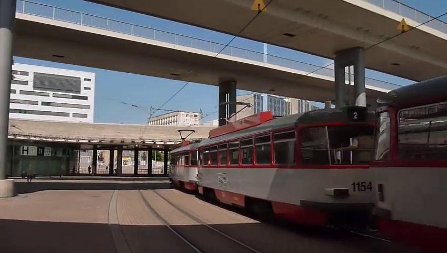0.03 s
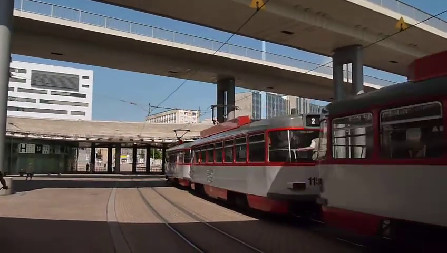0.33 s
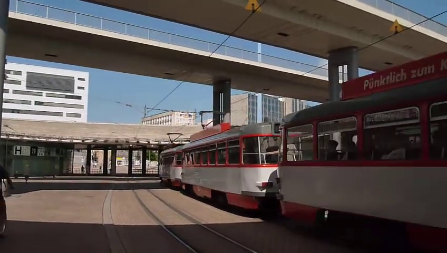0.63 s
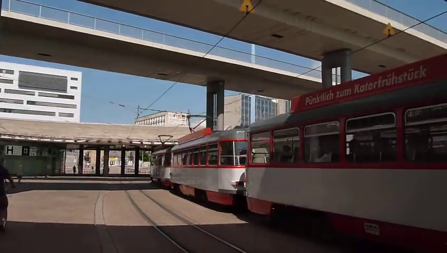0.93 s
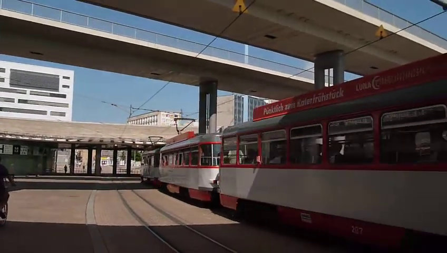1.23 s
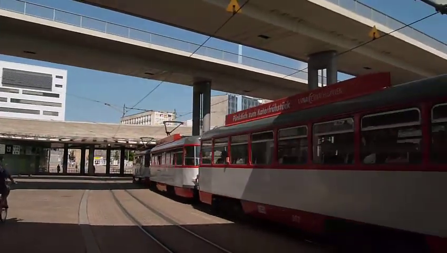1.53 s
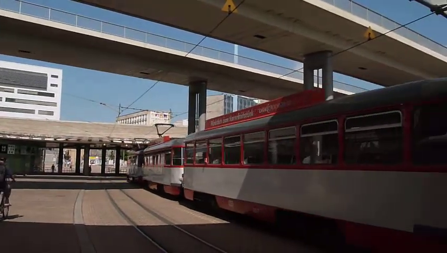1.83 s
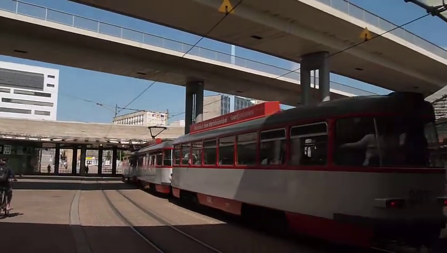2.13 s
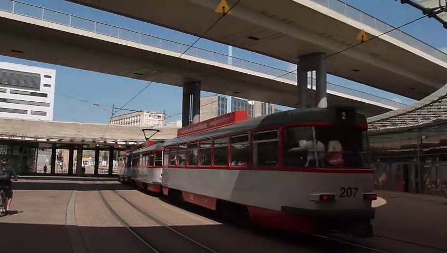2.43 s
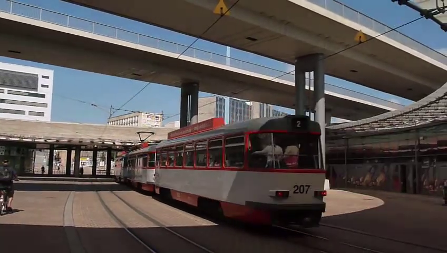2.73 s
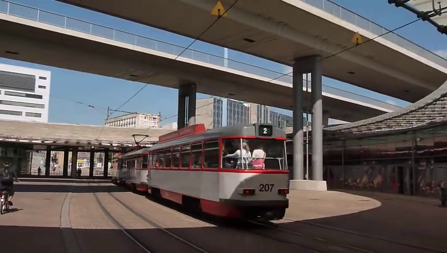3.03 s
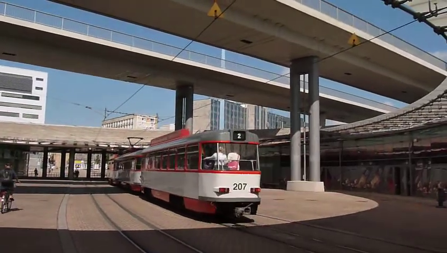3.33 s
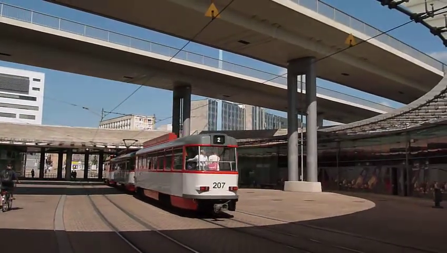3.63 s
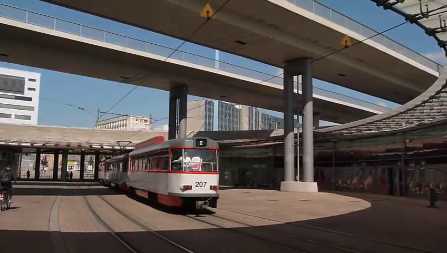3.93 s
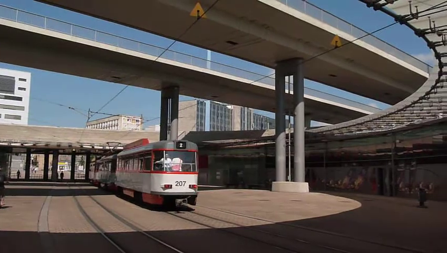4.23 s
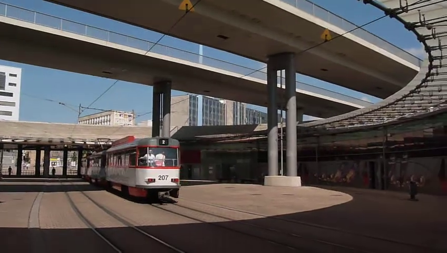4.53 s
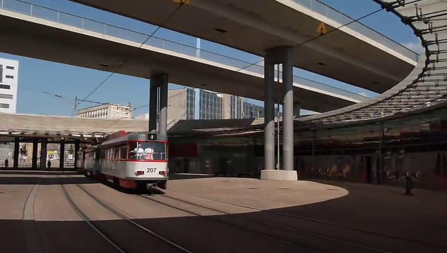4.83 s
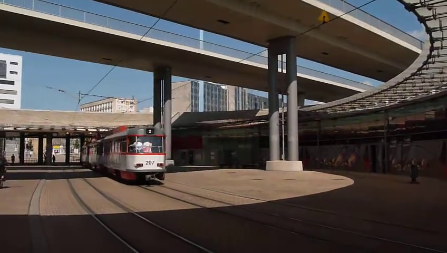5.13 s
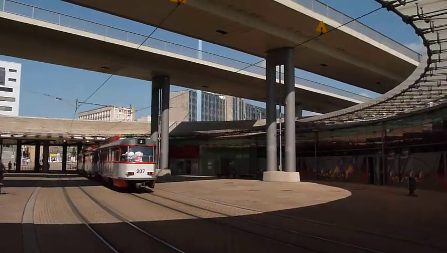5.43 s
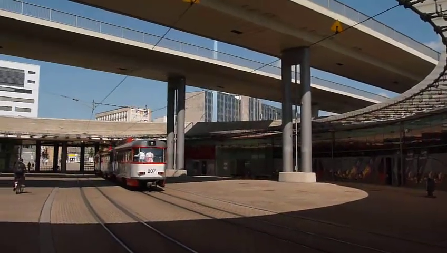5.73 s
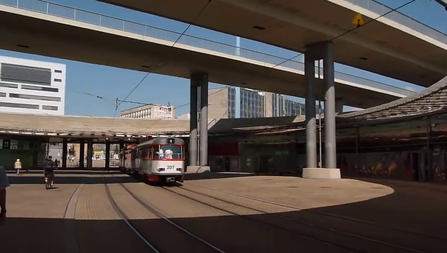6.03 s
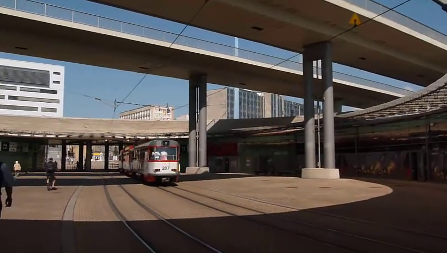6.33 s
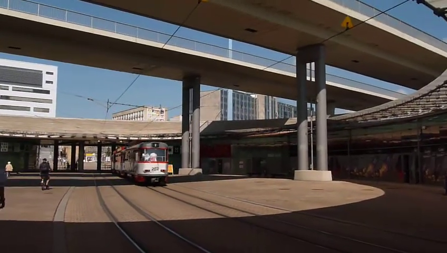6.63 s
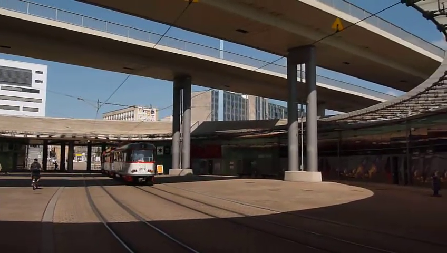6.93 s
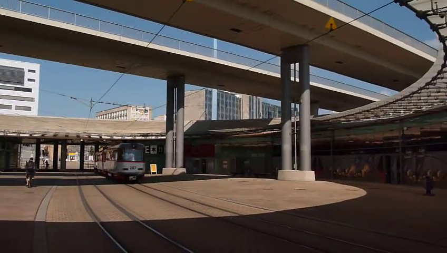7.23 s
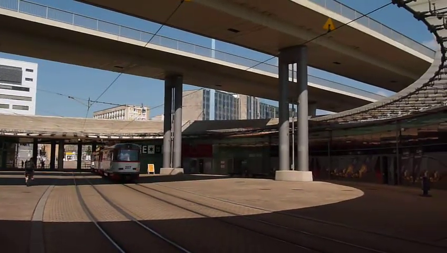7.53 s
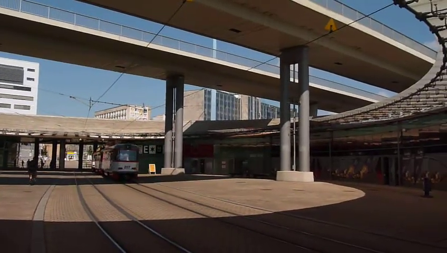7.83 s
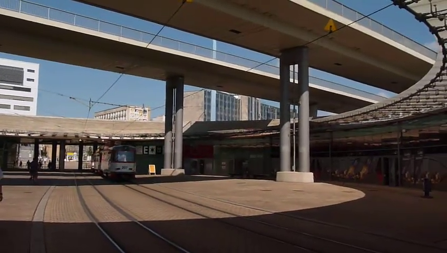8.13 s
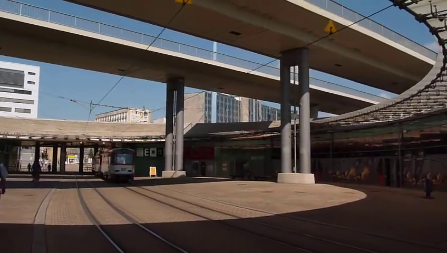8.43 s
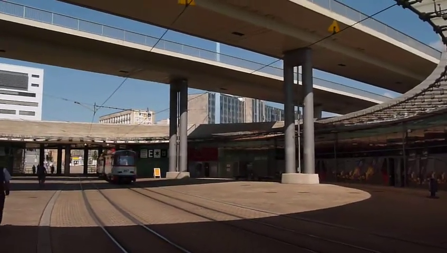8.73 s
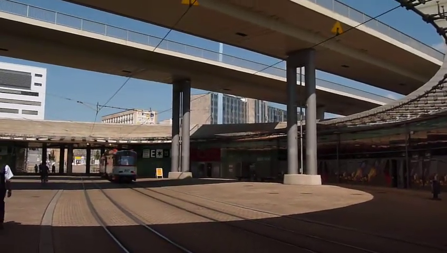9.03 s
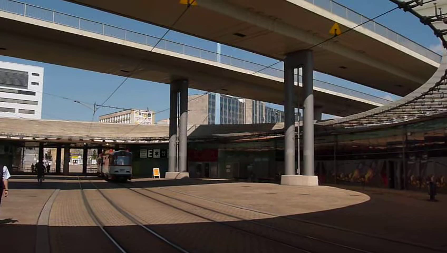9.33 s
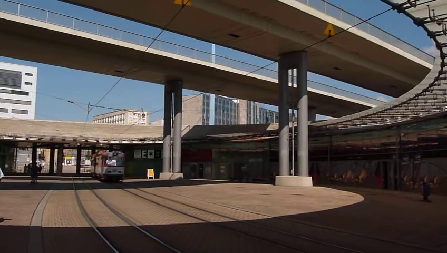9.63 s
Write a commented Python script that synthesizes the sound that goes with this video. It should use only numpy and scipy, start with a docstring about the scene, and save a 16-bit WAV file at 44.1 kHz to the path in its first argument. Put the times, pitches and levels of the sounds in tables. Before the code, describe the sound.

Tram wheels roar and howl round a curve in an echoing plaza, with a sinking gear whine, faint squeals and a few clanks.

```python
"""First you hear a tram rumbling round a curve close by, its wheels howling on one low note.
The wheel rims chirp and scrape, and a gear whine sinks as the cars roll away under road bridges
across a paved plaza. Twice the tram clanks over rail joints. At the end the howl of a slipping
wheel grows so loud that a limiter turns everything down."""
import sys
import numpy as np
from scipy import signal
from scipy.fft import rfft, irfft
from scipy.io import wavfile
from scipy.ndimage import uniform_filter1d

SR = 44100
rng = np.random.default_rng(int(sys.argv[2]) if len(sys.argv) > 2 else 0)


def persist_wave(psi):
    """Save psi, clipped to +-1, as 16-bit WAV."""
    counts = np.round(np.clip(psi, -1, 1) * 32767).astype(np.int16)
    wavfile.write(sys.argv[1], SR, np.atleast_2d(counts).T)


N = 431298
TIME, FREQS = np.arange(N) / SR, np.fft.rfftfreq(N, 1 / SR)


def gain_of(db):
    """Turns decibels into a number to multiply a sound by."""
    return 10 ** (np.asarray(db) / 20)


def evened(x):
    """Scales a signal so that its average power is 1."""
    return x / np.sqrt(np.mean(abs(x) ** 2) + 1e-20)


def curves(rows):
    """Joins the rows of a time table with straight lines, one curve for each column of values."""
    seconds, *columns = np.transpose(rows)
    return [np.interp(TIME, seconds, column) for column in columns]


def value_at(points, hz):
    """Looks up a frequency in a table, on a scale where octaves are evenly spaced."""
    table_hz, value = np.transpose(points)
    return np.interp(np.log(hz + 1), np.log(table_hz + 1), value)


def colour(points, resonances):
    """The gain at each frequency: a broad shape with narrow peaks and dips on it."""
    peaks_db = sum(db / (1 + (2 * (FREQS - hz) / width) ** 2) for hz, width, db in resonances)
    return gain_of(value_at(points, FREQS) + peaks_db)


def drift(rate_hz):
    """A random wobble in size and phase, up to about the given rate."""
    count = 4096
    hz = np.fft.fftfreq(count, TIME[-1] / count)
    noise = rng.standard_normal(count) + 1j * rng.standard_normal(count)
    wobble = np.fft.ifft(noise / (1 + (hz / rate_hz) ** 2))
    return evened(np.interp(TIME, np.linspace(0, TIME[-1], count), wobble))


def pure_tone(hz):
    """A tone that follows a pitch curve, as complex numbers; the real part is the sound."""
    return np.exp(2j * np.pi * np.cumsum(hz) / SR)


# How long the plaza echoes. Each row: frequency in Hz, seconds to fade by 60 dB.
ECHO_TIMES = [(200, 1.5), (1500, 1.7), (6000, 1.4)]

def plaza_echo(sound):
    """Paving, bridges and house fronts throw back a wash of echoes; the treble dies first."""
    hz, age, noise = signal.stft(rng.standard_normal(SR), SR, nperseg=256)
    decay = gain_of(-60 * age / value_at(ECHO_TIMES, hz)[:, None])
    build_up = 1 - np.exp(-age / 0.017)
    tail = signal.istft(noise * decay * build_up, SR, nperseg=256)[1]
    return signal.fftconvolve(sound, tail / np.linalg.norm(tail))[:N]


# The rolling swells as the cars run in under the bridges. Each row: time in seconds, level in dB.
SWELL = [(0, -4), (1.2, -3), (2.1, -3), (4, -2), (5.7, 0.5), (6.4, -.5), (7.7, 1.5), (8.5, -2.2),
         (9.78, 0.3)]
# Four layers, low to high: ground rumble, car body drone, wheel roar, hiss.
# Each row: base level in dB, how strongly it follows the swell, dB lost per second once far off.
LAYERS = [(-34.5, .9, 0.35), (-26.5, 1.2, 0), (-29, 1, 0.28), (-41.5, 1.05, 1.07)]
# Uneven track makes the low noise heave.
# Each row: middle in seconds, half length in seconds, change of rumble in dB, change of drone in dB.
TRACK_HEAVES = [(0.701, 0.69, 0, 1.9), (1.72, .16, 3.5, -1.5), (4.2, 0.29, 2, 0), (6.103, .3, 2.5, .5),
                (7.85, 0.19, 1.5, 3), (9.2, 0.97, 0.5, 1.5)]

def rolling_levels(far_off_s=5.15):
    """Each layer's level in dB: all swell, the two lowest heave, and distance takes the hiss away."""
    swell = curves(SWELL)[0]
    gone_s = np.maximum(TIME - far_off_s, 0)
    rumble, drone, roar, hiss = [db + follow * swell - loss * gone_s for db, follow, loss in LAYERS]
    for middle, half_length, rumble_db, drone_db in TRACK_HEAVES:
        heave = np.exp(-((TIME - middle) / half_length) ** 2)
        rumble, drone = rumble + rumble_db * heave, drone + drone_db * heave
    return rumble, drone, roar, hiss


# The broad shape of the rolling noise. Each row: frequency in Hz, relative level in dB.
ROLLING_SHAPE = [(22, -38), (36, -25.5), (52, -14.5), (115, -16), (190, -6), (320, -0.5), (490, -9),
                 (620, -5.5), (1000, -17), (1350, -19), (2340, -30.5), (4000, -37.5), (5500, -43.5),
                 (7400, -63)]
# Peaks and dips that wheels, rails and car body add to it.
# Each row: frequency in Hz, width in Hz, boost in dB close by, boost in dB far off.
ROLLING_RESONANCES = [(62.4, 23, 5.5, 1), (80, 9.8, -6.5, -2), (134, 20, 2, -4.5), (197, 77, 2.5, 5.5),
                      (332, 110, -4.5, -0.5), (770, 120, 4, 1), (1003, 120, -1.5, 3.5),
                      (1100, 190, 8.5, 4.5), (1216, 43, 4.5, 3), (1484, 55, 10, 4), (1708, 220, 9.5, 5),
                      (1941, 66, 5, 8), (2700, 110, -1, 0.5)]
# How far the last car has gone. Each row: time in seconds, distance from 0 (close) to 1 (far).
TRAM_DISTANCE = [(0, 0), (1.5, 0.18), (2.6, 0.63), (5, 1)]

def rolling(wander_db=1.27, grit_db=0.3):
    """Rough wheels on rough rails shake the ground, the car bodies and the steel itself."""
    roughness = rfft(rng.standard_normal(N))
    far = curves(TRAM_DISTANCE)[0]
    hz, width, near_db, far_db = np.transpose(ROLLING_RESONANCES)
    # A layer is fully on between its two corners; its core band sets how loud it is.
    corners_hz = [20, 130, 170, 420, 620, 1500, 2300, 8000]
    cores_hz = [(30, 150), (150, 480), (600, 1500), (2200, 5000)]
    out, levels = np.zeros(N), rolling_levels()
    for weight, boost_db in ((1 - far, near_db), (far, far_db)):
        spectrum = roughness * colour(ROLLING_SHAPE, zip(hz, width, boost_db))
        for layer, (low, high) in enumerate(cores_hz):
            band = np.interp(FREQS, corners_hz, np.repeat(np.arange(len(cores_hz)) == layer, 2))
            core_size = np.sqrt(2) * np.linalg.norm(spectrum[(FREQS > low) & (FREQS < high)]) / N
            out += weight * gain_of(levels[layer]) * irfft(spectrum * band, N) / core_size
    return out * gain_of(wander_db * drift(1.2).real + grit_db * drift(35).real)


# The gears whine and the motors hum. Each row: time in seconds, pitch in Hz, level in dB.
GEAR_WHINE = [(0, 805, -32.5), (.6, 812, -34), (1.22, 782, -32.5), (1.5, 786, -47.5), (2.1, 731, -37),
              (3, 716, -40.5), (4.3, 682, -41), (5.5, 647, -57)]
MOTOR_HUM = [(0, 214.5, -28), (.42, 210, -26.5), (.55, 208.4, -36), (1.25, 204.6, -37.5), (1.7, 202.6, -38),
             (3, 196.5, -46)]

def drive_tone(rows, spread_hz):
    """Several axles turn at nearly the same speed, so their tones blur together."""
    hz, db = curves(rows)
    fade = np.clip(rows[-1][0] + 1 - TIME, 0, 1)  # over one second after the last row
    return np.sqrt(2) * gain_of(db) * fade * (pure_tone(hz) * drift(spread_hz)).real


# Wheels scrape and clank over the track. Each row: start in seconds, level in dB,
# rise in seconds, seconds to fade by 60 dB, added brightness in dB per octave.
CLANKS = [(1.32, -27, 0.085, 1.94, 1.7), (1.364, -29, .002, .06, -1), (5.845, -26, .012, 0.84, 1.5),
          (7.256, -23.5, 0.021, 0.3, -0.5), (7.284, -17, 0.013, 0.43, -3.5),
          (7.313, -31, 0.0056, 0.39, 1.5), (7.39, -26.5, 0.029, 0.9, -2), (9.12, -26, 0.032, 1.1, -3.5)]
# The broad shape of a clank. Each row: frequency in Hz, relative level in dB.
CLANK_SHAPE = [(150, -17), (500, -15), (780, 1), (1200, -1.5), (1600, -9), (2600, -13.5), (4200, -21),
               (6000, -31), (7400, -59)]
# The notes at which the steel rings. Each row: frequency in Hz, width in Hz, boost in dB.
STEEL_RESONANCES = [(740, 52, 8), (1034, 64, 6), (1218, 22, 7), (1380, 40, 3.5), (2150, 37, 3.5),
                    (2720, 33, 3)]

def clanks(rattle_db=1.5):
    """Each blow sets the wheel frame and rail rattling, then dies away under the bridges."""
    out, age, hz = np.zeros(N), TIME[:SR], np.fft.rfftfreq(SR, 1 / SR)
    steel = np.interp(hz, FREQS, colour(CLANK_SHAPE, STEEL_RESONANCES))
    for start, db, rise, fade_s, tilt_db in CLANKS:
        envelope = np.minimum(age / rise, 1) * gain_of(db - 60 * np.maximum(age - rise, 0) / fade_s)
        brightness = gain_of(tilt_db * np.log2(hz + 100))
        rattle = evened(irfft(rfft(rng.standard_normal(SR)) * steel * brightness))
        part = out[round(start * SR):][:SR]
        part += (envelope * rattle)[:len(part)]
    return out * gain_of(rattle_db * drift(49).real)


# The wheels chirp and groan; the row at 4.198 s is the gear whine sounding an octave up. # Each row: start in
# seconds, length in seconds, first pitch in Hz, last pitch in Hz, relative level in dB.
SQUEAL_NOTES = [(1.135, 0.053, 5540, 5600, -48.5), (1.315, 0.12, 5550, 5440, -47),
                (1.335, 0.071, 3640, 3660, -46), (1.361, 0.017, 630, 586, -20.5),
                (1.431, 0.2, 4090, 4060, -51.5), (1.423, 0.32, 1368, 1338, -37),
                (1.501, .27, 3656, 3703, -40.5), (1.67, 0.098, 5540, 5450, -53),
                (1.761, 0.29, 3655, 3655, -50.5), (1.95, 0.83, 1114, 1100, -43),
                (2.02, .15, 5530, 5360, -45.5), (2.445, 0.067, 5320, 5200, -52),
                (3.4, 0.21, 5390, 5540, -49.5), (3.504, 0.12, 5466, 5576, -42),
                (3.9, .12, 5580, 5800, -48), (3.94, .086, 6500, 6600, -57), (4.198, 0.74, 1350, 1315, -48),
                (4.336, .14, 5570, 5750, -43), (4.38, .07, 6560, 6600, -56.5),
                (4.776, 0.086, 5860, 6030, -50), (4.757, 0.44, 326, 321.5, -32),
                (5.81, .17, 2195, 2125, -36), (5.833, 0.06, 1077, 1082, -26),
                (6.397, 0.092, 581.6, 602, -25), (6.43, 0.094, 182.3, 184, -26),
                (7.634, .14, 1055, 1038, -33.5), (7.996, 0.095, 1095, 1068, -35.5)]

def squeals(direct_db=0.9, echo_db=-2, roughness=0.85):
    """A wheel's rim touches the rail and briefly sings, and once the gears sing an octave up; the rough notes
    hang in the plaza."""
    out = np.zeros(N)
    for start, length, first_hz, last_hz, db in SQUEAL_NOTES:
        count = round(length * SR)
        blur_hz = 17 * (first_hz / 1000) ** 0.56  # a higher squeal is more blurred
        smoothing = np.exp(-0.5 * (np.fft.fftfreq(count, 1 / SR) / blur_hz / 2) ** 2)
        slips = rng.standard_normal(count) + 1j * rng.standard_normal(count)
        grip = evened(np.fft.ifft(np.fft.fft(slips) * smoothing))
        glide = pure_tone(np.linspace(first_hz, last_hz, count))
        note = evened(((1 + roughness * grip) * glide).real)
        out[round(start * SR):][:count] += gain_of(db) * signal.windows.tukey(count, 0.9) * note
    return gain_of(direct_db) * out + gain_of(echo_db) * plaza_echo(out)


# Faint higher notes in a howl. Each row: multiple of the pitch, relative level in dB, blur in Hz.
OVERTONES = [(2, -28, 20), (3, -29.5, 18), (4, -42, 20)]

def howl(level, hz, second_wheel, beat_hz, scatter, waver_hz, overtone_db):
    """A wheel slips sideways and sings one note; a weaker wheel and echoes make it throb."""
    wheel = pure_tone(hz + waver_hz * drift(7).real)
    beat = pure_tone(beat_hz * (1 + 0.449 * drift(4.16).real))
    throb = evened(1 + second_wheel * beat + scatter * drift(13))
    tone = level * wheel * throb
    # The overtones throb on their own, so they follow only the slow strength of the slipping.
    slip = gain_of(overtone_db) * np.sqrt(abs(uniform_filter1d(level ** 2, size=16000)))
    for multiple, db, blur_hz in OVERTONES:
        flutter = evened(1 + 0.9 * drift(blur_hz))
        tone += slip * gain_of(db) * wheel ** round(multiple) * flutter
    return np.sqrt(2) * tone.real


def howl_strength(rows, edge_s=0.05):
    """The strength of one stretch of howling, with a quick fade to silence at each end."""
    inside_s = np.minimum(TIME - rows[0][0], rows[-1][0] + 2 * edge_s - TIME)
    return gain_of(curves(rows)[0]) * np.clip(1 + inside_s / edge_s, 0, 1)


# How hard the wheels slip close by. Each row: time in seconds, level in dB.
NEAR_SLIP = [(0, -25), (.27, -30.5), (.47, -22), (.62, -29), (.88, -23), (1.0, -31.5), (1.14, -22),
             (1.28, -21.5), (1.38, -25.5), (1.72, -22), (1.92, -33), (1.98, -16.5), (2.3, -25.5),
             (2.76, -21.5), (2.86, -27.5), (3.7, -29), (4.2, -43)]
# Their note sags as the cars go by. Each row: time in seconds, pitch in Hz.
NEAR_NOTE = [(.4, 542.5), (.8, 537.3), (1.6, 531.5), (2.8, 534.5), (3.8, 533)]

def near_howl():
    """Several wheels howl at once as the cars pass, so the note throbs deeply."""
    return howl(howl_strength(NEAR_SLIP), curves(NEAR_NOTE)[0],
                second_wheel=0.62, beat_hz=9, scatter=0.57, waver_hz=1.5, overtone_db=1.5)


# Deeper in the curve the wheels hoot. Each row: middle in seconds, length in seconds, level in dB.
FAR_HOOTS = [(6.61, 0.034, -18.5), (6.735, .1, -19), (6.89, 0.4, -23), (7.11, 0.13, -22.5),
             (7.492, 0.69, -32), (7.833, 0.1, -25), (8.009, 0.14, -18.5), (8.134, 0.064, -18),
             (8.222, 0.086, -14.5)]
# Then one wheel takes over and howls on. Each row: time in seconds, level in dB.
FAR_SLIP = [(8.27, -26.5), (8.3, -12), (8.42, -11), (8.71, -21.5), (8.82, -8), (9.09, -16.5),
            (9.145, -25.5), (9.235, -13), (9.4, -11), (9.61, -14), (9.72, -12)]

def far_howl(pitch_hz=541, echo_db=-9):
    """A distant wheel catches in hoots that echo under the bridges, then holds a loud, clear note."""
    hoots = sum(gain_of(db) * np.cos(np.pi * np.clip((TIME - middle) / length, -0.5, 0.5)) ** 2
                for middle, length, db in FAR_HOOTS)
    catching = howl(hoots, pitch_hz,
                    second_wheel=0.2, beat_hz=9, scatter=0.33, waver_hz=3.9, overtone_db=0.5)
    holding = howl(howl_strength(FAR_SLIP), pitch_hz,
                   second_wheel=0.24, beat_hz=11, scatter=0.16, waver_hz=1.8, overtone_db=1.0)
    return catching + gain_of(echo_db) * plaza_echo(catching) + holding


def scene():
    """All the sounds of the tram, added up on one channel."""
    drive = drive_tone(GEAR_WHINE, spread_hz=15) + drive_tone(MOTOR_HUM, spread_hz=5.4)
    return (rolling() + near_howl() + far_howl() + drive + squeals() + clanks())[None]


def record(dry, threshold_db=-17.5, fall_db_per_s=26, squeeze=0.77, attack_s=0.0064, top_hz=7300):
    """A limiter turns loud moments down quickly and lets go slowly; then the top treble is cut."""
    power_db = 10 * np.log10(abs(uniform_filter1d(dry[0] ** 2, size=700)) + 1e-12)
    held_db = np.maximum.accumulate(power_db + fall_db_per_s * TIME) - fall_db_per_s * TIME
    excess_db = np.maximum(held_db - threshold_db, 0)
    lag = np.exp(-1 / (attack_s * SR))
    cut_db = squeeze * signal.lfilter([1 - lag], [1, -lag], excess_db)
    lowpass = signal.firwin(161, top_hz, window=("kaiser", 9), fs=SR)
    return signal.oaconvolve(dry * gain_of(-cut_db), lowpass[None], "same")


dry = scene()
out = record(dry)
persist_wave(out)
```